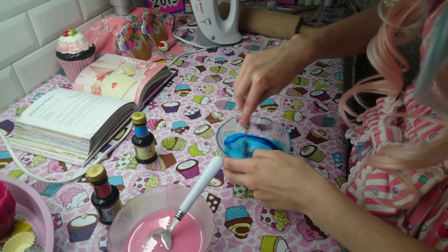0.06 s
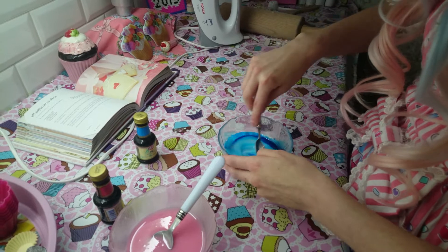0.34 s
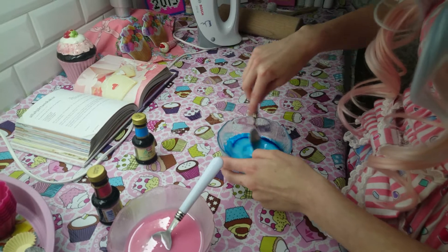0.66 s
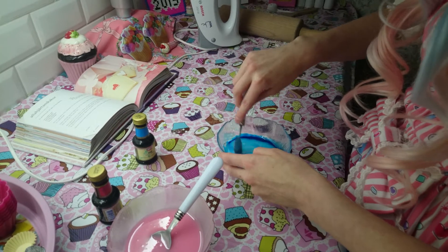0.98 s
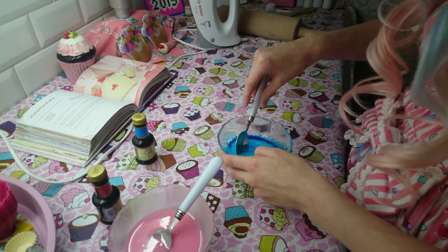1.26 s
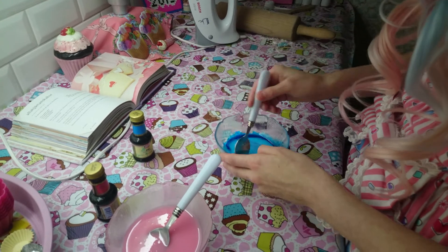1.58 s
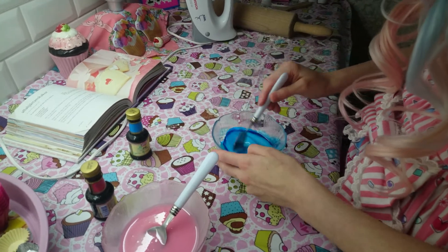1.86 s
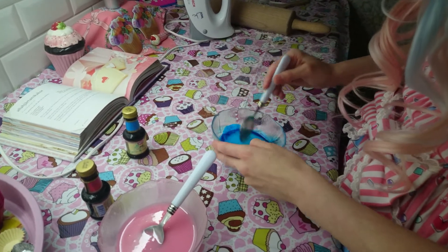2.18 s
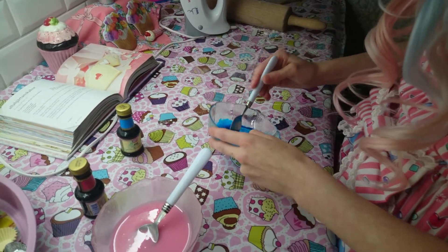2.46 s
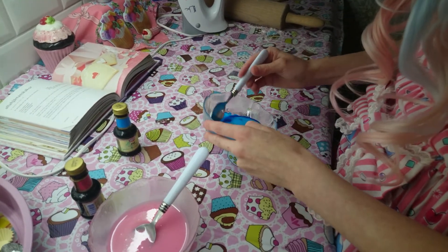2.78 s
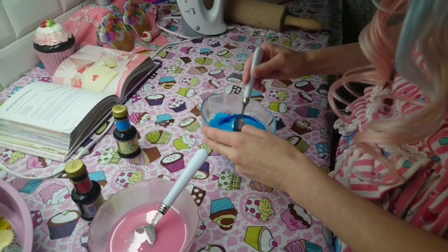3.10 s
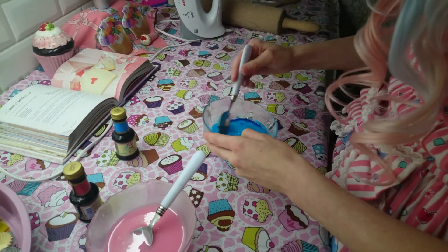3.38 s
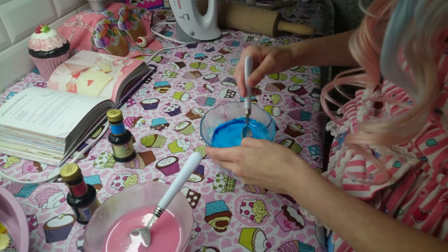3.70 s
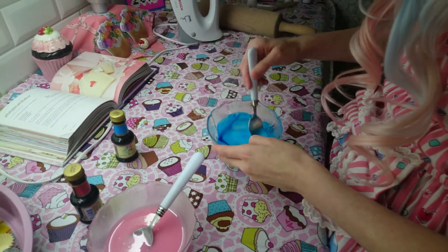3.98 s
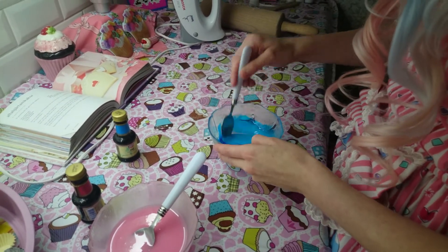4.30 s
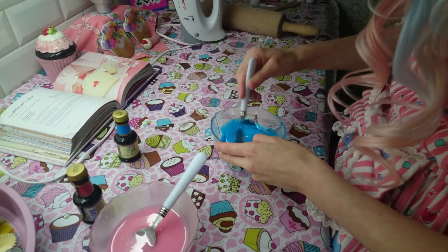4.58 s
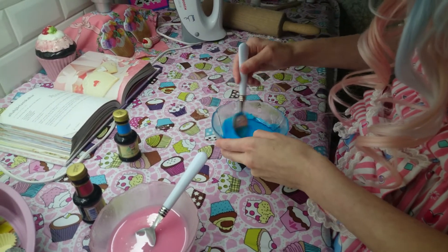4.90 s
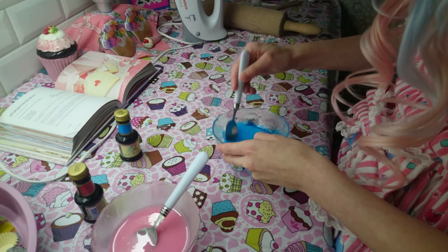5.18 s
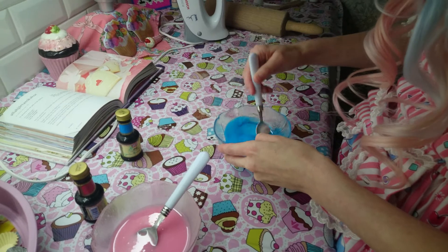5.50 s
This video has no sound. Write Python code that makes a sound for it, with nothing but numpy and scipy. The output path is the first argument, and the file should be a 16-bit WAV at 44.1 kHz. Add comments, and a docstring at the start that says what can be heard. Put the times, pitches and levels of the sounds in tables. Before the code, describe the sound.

Bright, irregular clinks and soft, grainy scrapes of a spoon mixing something thick in a glass bowl in a kitchen.

```python
"""Gritty scraping and bright, short clinks: a metal spoon stirs a thick mixture in a small glass bowl.
Grains crackle under the spoon, its edge squeaks on the wall, air pockets pop; hand and filling damp the
glass. A few knocks on the rim also sound the kitchen table, where the hand shifts the bowl with soft bumps.
Table top and tiled wall throw each clink back at once, and the kitchen rings briefly after it."""
import sys
import numpy as np
from scipy import signal
from scipy.fft import rfft, irfft, next_fast_len
from scipy.io import wavfile

SR = 44100
rng = np.random.default_rng(int(sys.argv[2]) if len(sys.argv) > 2 else 0)


def bounce(signal):
    """Save signal as a 16-bit WAV file at the path given by the first command-line argument."""
    frames = np.transpose(np.atleast_2d(signal))
    limited = np.clip(frames, -1, 1)
    pcm = np.round(limited * 32767).astype(np.int16)
    wavfile.write(sys.argv[1], SR, pcm)


N = 249165
TIME = np.arange(N) / SR
FIRM_DB = -34   # level of a firm blow


def from_db(db):
    """Decibels to gain."""
    return 10 ** (np.asarray(db) / 20)


def unit_rms(x):
    """Scale to unit power."""
    return x / np.sqrt(np.mean(x ** 2) + 1e-20)


def at_hz(table, hz, column=1):
    """Interpolate a table column over log frequency."""
    table = np.array(table)
    return np.interp(np.log(hz + 1e-9), np.log(table[:, 0]), table[:, column])


def band(x, low_hz, high_hz, order=2):
    """Causal band-pass."""
    sos = signal.butter(order, [low_hz, min(high_hz, .45 * SR)], "band", fs=SR, output="sos")
    return signal.sosfilt(sos, x)


def colour(x, spectrum):
    """Filter by a table of f/Hz, gain/dB."""
    size = next_fast_len(N)
    gain = from_db(at_hz(spectrum, np.fft.rfftfreq(size, 1 / SR)))
    return irfft(rfft(x, size) * gain, size)[..., :N]


def wander(rate_hz, count):
    """Rows of low-passed noise, unit RMS."""
    sos = signal.butter(2, rate_hz, fs=SR, output="sos")
    return unit_rms(signal.sosfilt(sos, rng.standard_normal((count, N))))


def left_right(mid, side, pan_db=0):
    """Mid/side to stereo; pan is left over right."""
    lean = from_db([[pan_db / 2], [-pan_db / 2]])
    return np.array([mid + side, mid - side]) * lean / np.sqrt(np.mean(lean ** 2))


# Diffuse-field width: f/Hz, side over mid/dB
WIDTH = [(60, 10), (130, 9), (300, 4.5), (700, 2), (3000, 2), (15000, 0.3)]

def diffuse(pair):
    """Two independent noises as a wide field, the bass largely in antiphase."""
    return left_right(pair[0], colour(pair[1], WIDTH))


# Noise floor: f/Hz, relative density/dB
FLOOR_SPECTRUM = [(15, -20), (25, -21), (65, 3), (135, -4.5), (177, -4), (296, -7.5), (483, -9.5),
                  (524, -8), (669, -10), (726, -10), (1280, -12), (2270, -6.5), (4730, -16.5), (11900, -15),
                  (16500, -44)]
# Bowl shifting on the table: t/s, level/dB
BUMPS = [(0.06, -72), (0.17, -74.5), (0.6, -75), (1.01, -74), (1.515, -74.5), (1.772, -71.5), (1.94, -76.5),
         (3.81, -96)]

def background(floor_db, bump_rise_s):
    """Faint steady noise, and soft low bumps as the hand shifts the bowl."""
    floor = from_db(floor_db) * unit_rms(colour(rng.standard_normal((2, N)), FLOOR_SPECTRUM))
    swell = np.zeros(N)
    for start_s, level_db in BUMPS:
        age = np.maximum(TIME - start_s, 0) / bump_rise_s
        swell += from_db(level_db) * age * np.exp(1 - age)
    rumble = unit_rms(band(rng.standard_normal((2, N)), 67, 150))
    return diffuse(floor + swell * rumble)


# Kitchen reverberation: f/Hz, t60/s, gain/dB
KITCHEN_DECAY = [(308, 0.98, 4), (1240, 0.42, -0.5), (2540, 0.36, -3.5), (4000, 0.3, -4.5),
                 (6000, 0.46, -13.5), (9740, 0.23, -3), (15300, 0.38, -16)]

def kitchen(sent, rise_s):
    """Wall reflections merge into a diffuse tail that dies sooner in the treble."""
    t = np.arange(SR * 3 // 5) / SR
    white, tail = rng.standard_normal((2, 2, len(t))), 0
    edges_hz = np.geomspace(200, 19000, 14)
    for k, (low_hz, high_hz) in enumerate(zip(edges_hz, edges_hz[1:])):
        hz = np.sqrt(low_hz * high_hz)
        fade = from_db(-60 * t / at_hz(KITCHEN_DECAY, hz)) * (1 - np.exp(-t / rise_s))
        gain = from_db(at_hz(KITCHEN_DECAY, hz, column=2)) / np.sqrt(np.sum(fade ** 2))
        tail += gain * fade * band(white[k % 2], low_hz, high_hz)
    mid, side = signal.fftconvolve(sent[None], tail, axes=1)[:, :N]
    return left_right(mid, side, pan_db=2.0)


# Mixture tearing off the spoon: t/s, level/dB, f/Hz, pan/dB
POPS = [(0.0144, -33.5, 6080, -9), (0.7648, -22.5, 7170, -7), (1.9664, -33.5, 6200, -11),
        (2.7229, -36.5, 5360, 0), (3.5595, -40, 5700, 3), (4.6829, -30.5, 5660, 5)]

def wet_pops(t60_s, rise_s, fizz_db):
    """Tiny air pockets snap open and ring for a few milliseconds."""
    t = np.arange(SR // 40) / SR
    out = np.zeros((2, N))
    for start_s, level_db, hz, pan_db in POPS:
        fizz = from_db(fizz_db) * unit_rms(band(rng.standard_normal((2, len(t))), hz * .67, hz * 1.28))
        tone = np.sin(2 * np.pi * hz * t - [[0], [np.pi / 2]])
        snap = (tone + fizz) * (1 - np.exp(-t / rise_s)) * from_db(level_db - 60 * t / t60_s)
        out[:, int(start_s * SR) + np.arange(len(t))] += left_right(*snap, pan_db)
    return out


# Stirring effort, with two rests: t/s, level/dB
EFFORT = [(0.0, -59), (0.4, -64), (0.8, -65), (1.02, -63), (1.24, -76), (1.42, -79), (1.53, -63.5),
          (1.7, -68.5), (2.09, -66.5), (2.22, -75.5), (2.58, -107), (2.66, -77), (3.02, -65), (3.2, -68),
          (3.65, -70), (3.86, -63.5), (4.4, -69.5), (4.85, -66), (5.2, -69), (5.42, -59.5), (5.65, -66)]
# Spoon dragging through the mixture: f/Hz, relative density/dB
DRAG_SPECTRUM = [(290, -56), (500, 9.5), (570, -4.5), (994, -11), (1450, -10.5), (1790, -11), (2010, -8),
                 (3070, -7), (3930, -4), (4360, -8), (6470, -11), (11000, -24), (13800, -26),
                 (15300, -13.5), (16500, -50)]

def stirring(drag_db, grit_db, split_hz, grains_per_s, size_db, hiss_db, clump_db):
    """Grains caught between spoon and glass crackle in clumps over the smooth hiss of the drag."""
    effort_db = np.interp(TIME, *np.transpose(EFFORT))
    sizes = from_db(size_db * np.minimum(rng.exponential(1, N), 4))
    caught = rng.random(N) < grains_per_s / SR
    grains = sizes * caught * rng.standard_normal((2, N))
    clumps = from_db(clump_db * np.tanh(wander(50, count=1)))
    hiss = from_db(hiss_db) * rng.standard_normal((2, N))
    rub = colour(unit_rms(grains * clumps) + hiss, DRAG_SPECTRUM)
    drag = from_db(drag_db) * unit_rms(band(rub, 1140, split_hz, order=3))
    grit = from_db(grit_db) * unit_rms(band(rub, split_hz, 15700, order=3))
    return diffuse(from_db(effort_db) * (drag + grit))


# Spoon edge biting the wall, gliding as it dips and lifts: t/s, length/s, start f/Hz, end f/Hz, level/dB
SQUEAKS = [(0.093, 0.073, 6170, 5400, -61.5), (0.143, 0.0073, 5000, 4890, -32),
           (0.513, 0.103, 4120, 4000, -67), (0.819, 0.064, 4370, 4800, -59.5),
           (3.677, 0.035, 2263, 2510, -64), (3.894, 0.061, 3510, 3594, -60),
           (3.948, 0.046, 4120, 4650, -64), (4.018, 0.076, 5720, 4720, -66),
           (4.073, 0.133, 3930, 4160, -64.5), (4.244, 0.018, 4000, 4200, -46),
           (4.491, 0.089, 4900, 5240, -66.5), (4.597, 0.072, 3580, 4170, -69),
           (4.784, 0.051, 5200, 5000, -54.5), (5.015, 0.012, 4620, 4570, -34),
           (5.237, 0.046, 4810, 4360, -52.5), (5.477, 0.078, 3100, 5400, -55.5)]

def scrapes(sing_db, sing_hz, swing_hz, wander_hz, half_width_hz, pan_db):
    """Friction drives a broad resonance: the glass sings faintly with the effort, the spoon squeaks."""
    friction = wander(half_width_hz, count=2) + 1j * wander(half_width_hz, count=2)
    effort_db = np.interp(TIME, *np.transpose(EFFORT))
    pitch_hz = sing_hz + swing_hz * wander(wander_hz, count=1)[0]
    out = from_db(effort_db + sing_db) * np.real(friction * np.exp(2j * np.pi * np.cumsum(pitch_hz) / SR))
    for start_s, length_s, from_hz, to_hz, level_db in SQUEAKS:
        span = (TIME >= start_s) & (TIME < start_s + length_s)
        progress = (TIME[span] - start_s) / length_s
        phase = 2 * np.pi * np.cumsum(from_hz + (to_hz - from_hz) * progress) / SR
        swell = from_db(level_db) * np.sin(np.pi * progress)
        out[:, span] += swell * np.real(friction[:, span] * np.exp(1j * phase))
    return left_right(*out, pan_db)


# Damped modes of bowl and spoon: f/Hz, level/dB, t60/s
BOWL_MODES = [(880, -43, 0.012), (1250, 20.5, 0.0088), (1450, 1.5, 0.06), (2020, 1.5, 0.0066),
              (2400, -2.5, 0.028), (2800, -16.5, 0.0053), (3470, 5.5, 0.01), (3940, -8, 0.11),
              (4750, -20, 0.021), (5000, 6.5, 0.014), (5400, 5, 0.011), (6120, 8, 0.0076),
              (6130, 15, 0.0024), (6800, -14, 0.0049), (7580, -14, 0.018), (8340, 6.5, 0.0067),
              (9080, 3.5, 0.012), (9120, -15, 0.028), (9810, 2.5, 0.015), (10300, -21, 0.016),
              (12960, -6, 0.024), (15600, 16.5, 0.04), (15100, 12, 0.032)]

def bowl_ring(t, uneven_db, detune, tick_db):
    """A sharp tick and the modes it excites; grip and filling shift them from blow to blow."""
    hz, level_db, t60_s = np.transpose(BOWL_MODES)[:, :, None]
    hz = hz * (1 + detune * rng.standard_normal(hz.shape))
    strength = from_db(level_db + uneven_db * rng.standard_normal(hz.shape))
    modes = strength * from_db(-60 * t / t60_s) * np.cos(2 * np.pi * hz * t)
    return from_db(tick_db) * (t == 0) + modes.sum(axis=0)


def contact_paths(t, attack, level_db, firm_t60_s, halving_db, early_db, early_t60_s, direct_db):
    """Mid/side response: direct path, skid (shorter for soft blows), echoes off table and tiles."""
    skid_t60_s = firm_t60_s * 2 ** min((level_db - FIRM_DB) / halving_db, 0)
    fade = from_db(-60 * t / skid_t60_s) + from_db(early_db - 60 * t / early_t60_s)
    paths = rng.standard_normal((2, len(t))) * attack * fade
    paths[[0, 1], [12, 18]] += from_db(direct_db)   # mid leads side by 6 samples
    return paths


# Colour and direction of an average clink: low f/Hz, high f/Hz, gain/dB, pan/dB
CLINK_BANDS = [(725, 1510, -40, -1.5), (1983, 3300, -23.5, 13.5), (3084, 4500, -17.5, 7.5),
               (5200, 7590, -18.5, -6), (7900, 14700, -27, -1.5)]
# Spoon on glass: t/s, level/dB, body/dB, brightness/(dB/octave), spoon note re level/dB, note f/Hz, pan/dB
CLINKS = [(0.143, -36.5, 1.5, -1.5, 3, 4860, 1), (0.252, -51.5, -13, 2, 0, 5270, 0),
          (0.359, -53.5, -12, 4, 8, 5070, -7), (0.375, -45, 1.5, -3, 9.5, 5200, -1),
          (0.429, -49, 0.5, 0, 4, 3590, 1), (0.477, -57.5, -6, -1, 6, 5200, 0),
          (0.607, -50, 4.5, -3.5, 4.5, 5200, 1), (0.665, -56.5, 3, -15, 2, 3820, 6),
          (0.725, -50.5, -21, 6, 0, 4340, -2), (0.78, -49, 0.5, 2, 5, 4550, 9),
          (0.788, -46, -1, 1, 6, 3470, -3.5), (0.857, -58, -1, -4, 3, 4690, -5),
          (0.897, -59.5, 6.5, -19, 8, 3650, 4), (0.972, -58, -13, 9, 10.5, 4510, 1),
          (1.175, -59, -1, 3.5, -3, 5100, 0), (1.484, -54.5, 2.5, 5, 1, 4060, 4),
          (1.521, -55, 13.5, -19, 7, 3800, 1), (1.65, -54.5, 9.5, -17, 8.5, 2136, -1),
          (1.734, -61, -10, 9.5, 4, 5270, -1), (1.901, -58, -1, 5.5, 2, 3800, -1),
          (2.092, -56.5, -14, 4, 5.5, 3980, -3), (2.406, -47.5, 5, -7.5, 3, 3520, 1),
          (2.592, -34, -1.5, 2, 3, 5540, 0), (2.784, -29, -2.5, 5.5, 2.5, 3924, -2.5),
          (2.841, -31, 1, 8.5, 1, 3960, -1), (2.88, -34, 4, -1.5, -5, 5700, -6),
          (2.998, -23.5, -3.5, 3, 1, 6060, -5), (3.054, -42, 3.5, 6.5, 7, 4020, -6),
          (3.226, -50.5, 6.5, -4.5, 5.5, 5800, -8), (3.365, -53.5, -8, 1, 2, 3610, 1),
          (3.439, -55, 8, -3.5, 1, 3760, -11), (3.66, -56, -18, -3, -8, 3470, 0),
          (3.736, -54.5, 1.5, -.5, 5, 5780, -6), (3.814, -29.5, -2.5, 1, -3, 2500, -1.5),
          (4.203, -55, -3, 8, 6, 4370, 0), (4.249, -43, 1, 1, 1, 4120, 2),
          (4.311, -45, -2, 3.5, 3, 5840, -2), (4.772, -38, 2, 0, 3.5, 5900, -2.5),
          (4.978, -47, 0.5, 2, 8, 5500, 0), (4.987, -42, 4, 2, 9.5, 5820, -7.5),
          (5.014, -38, 2.5, 1, 14, 4680, -5.5), (5.203, -44, 5.5, -1.5, 3, 3680, -3.5),
          (5.251, -44.5, 3, -1.5, 0, 4780, -4), (5.303, -49, 5, -7, -1, 2250, -2),
          (5.356, -50.5, 6, -10, 6, 2400, 0), (5.369, -29, 1, 2.5, 1.5, 6260, -3),
          (5.601, -28.7, -0.5, 3, 5, 6290, -4.5)]

def clinks(rise_s, note_t60_s, side_db, room_db, note_room_db, body_below_hz, pivot_hz):
    """The spoon's back wakes the bowl's body, its edge ticks brightly. Returns stereo and room send."""
    t = np.arange(SR // 8) / SR
    near, sent = np.zeros((2, N + len(t))), np.zeros(N + len(t))
    attack = 1 - np.exp(-t / rise_s)
    for start_s, level_db, body_db, db_per_octave, note_db, note_hz, pan_db in CLINKS:
        ring = bowl_ring(t, uneven_db=3.5, detune=.006, tick_db=25.0)
        paths = contact_paths(t, attack, level_db, firm_t60_s=.014, halving_db=10,
                              early_db=-8.0, early_t60_s=.081, direct_db=7.5)
        # rows of rings and note: mid, side, room send
        rings = np.vstack([signal.fftconvolve(ring[None], paths, axes=1)[:, :len(t)], ring])
        note = np.sin(2 * np.pi * note_hz * t - [[0], [np.pi / 2], [0]])   # varies with grip and depth
        note *= attack * from_db(level_db + note_db - 60 * t / note_t60_s)
        note[2] *= from_db(note_room_db)
        span = int(start_s * SR) + np.arange(len(t))
        for low_hz, high_hz, gain_db, band_pan_db in CLINK_BANDS:
            part = np.array([unit_rms(row) for row in band(rings, low_hz, high_hz, order=3)])
            hz = np.sqrt(low_hz * high_hz)
            tilt_db = body_db if hz < body_below_hz else db_per_octave * np.log2(hz / pivot_hz)
            part *= from_db(level_db + gain_db + tilt_db)
            mid, side, outward = part + note * (low_hz <= note_hz < high_hz)
            near[:, span] += left_right(mid, from_db(side_db) * side, band_pan_db + pan_db)
            sent[span] += from_db(room_db) * outward
    return near[:, :N], sent[:N]


def rim_knocks(from_s, to_s, hz, t60_s, rise_s, knock_db, db_per_blow_db):
    """Blows on the rim press the bowl down and excite one hollow resonance of the table top."""
    t = np.arange(SR // 6) / SR
    blows = np.zeros(N)
    for start_s, level_db, *_ in CLINKS:
        if from_s < start_s < to_s:
            blows[int(start_s * SR)] = from_db(knock_db + db_per_blow_db * (level_db - FIRM_DB))
    envelope = (1 - np.exp(-t / rise_s)) * from_db(-60 * t / t60_s)
    ring = envelope * np.sin(2 * np.pi * hz * t - [[0], [np.pi / 2]])
    return left_right(*signal.fftconvolve(blows[None], ring, axes=1)[:, :N])


def scene():
    """Bowl and spoon in the kitchen."""
    near, sent = clinks(rise_s=.00038, note_t60_s=.026, side_db=4.0, room_db=3.0, note_room_db=-1.5,
                        body_below_hz=3000, pivot_hz=4900)
    rub = scrapes(sing_db=-9.5, sing_hz=4200, swing_hz=389, wander_hz=6, half_width_hz=320, pan_db=3.0)
    rub += stirring(drag_db=-4.0, grit_db=-1.5, split_hz=4960, grains_per_s=900,
                    size_db=3.0, hiss_db=1.0, clump_db=6.5)
    pops = wet_pops(t60_s=.0055, rise_s=.0005, fizz_db=-5.0)
    table = rim_knocks(from_s=2.35, to_s=3.3, hz=611, t60_s=.042, rise_s=.00032,
                       knock_db=-59.5, db_per_blow_db=.74)
    room = kitchen(sent + np.mean(rub + pops + table / 2, axis=0), rise_s=.00061)
    return near + rub + pops + table + room + background(floor_db=-74.0, bump_rise_s=.024)


def record(dry):
    """Steep low-pass at 16.2 kHz."""
    return signal.sosfilt(signal.ellip(10, .3, 70, 16200, fs=SR, output="sos"), dry)


dry = scene()
out = record(dry)
bounce(out)
```